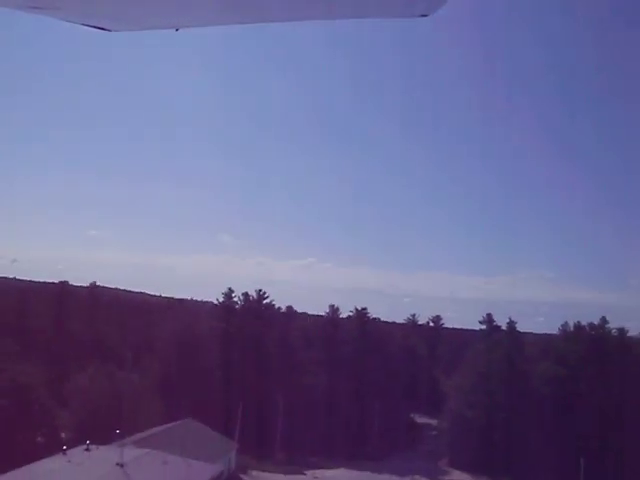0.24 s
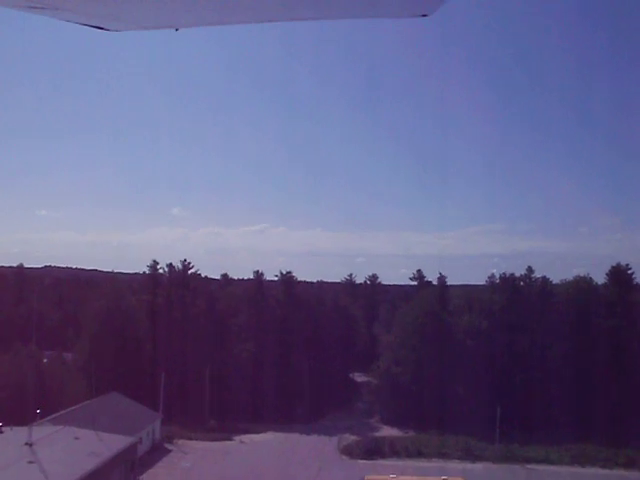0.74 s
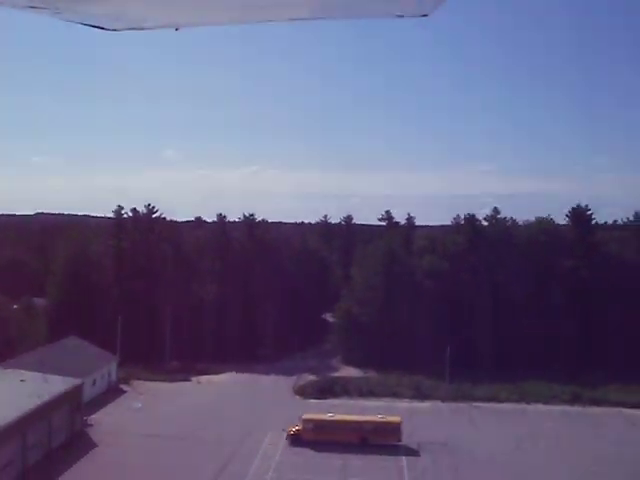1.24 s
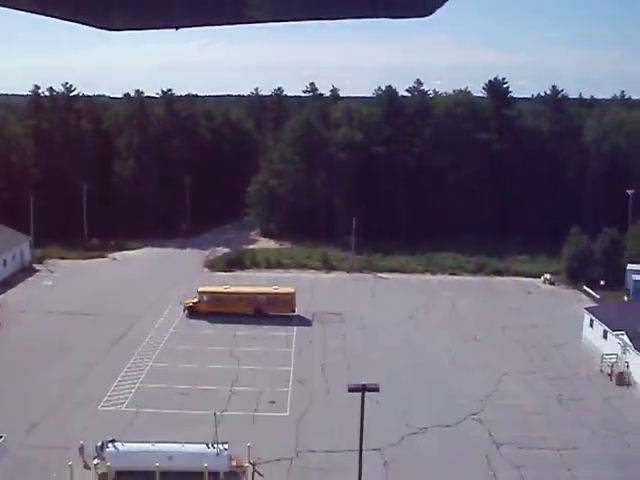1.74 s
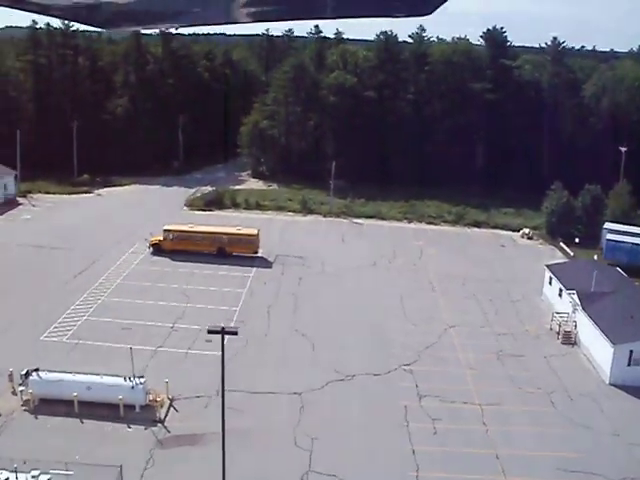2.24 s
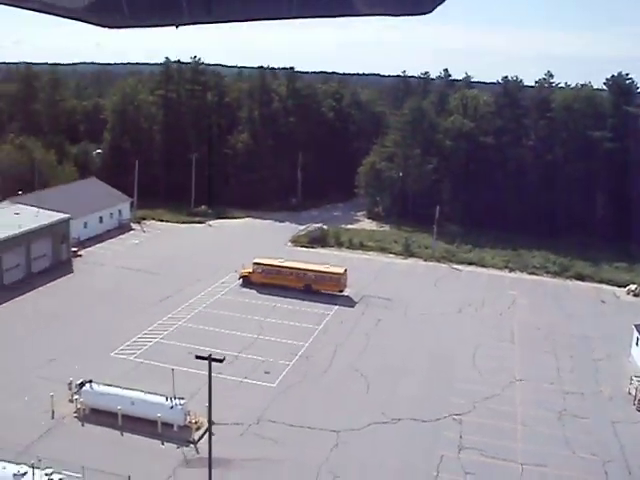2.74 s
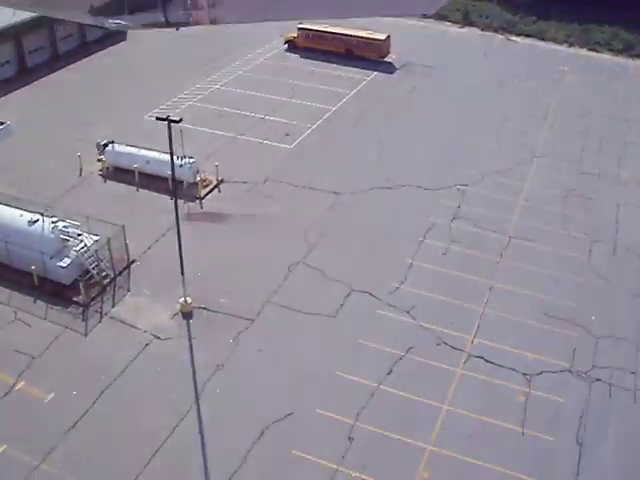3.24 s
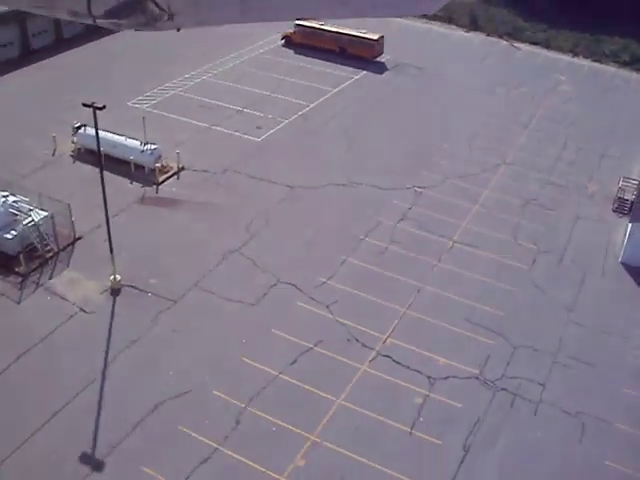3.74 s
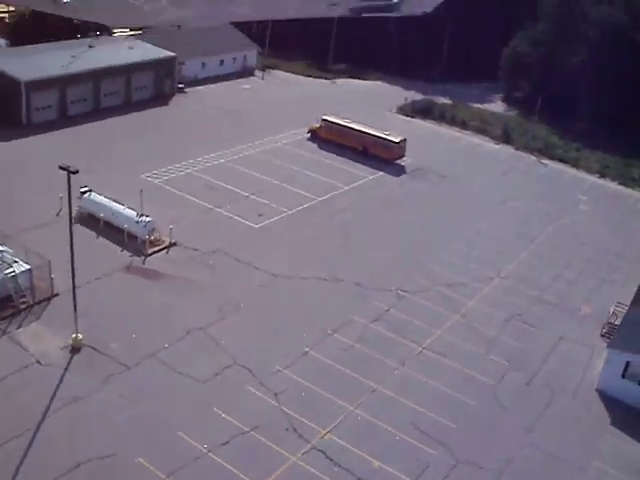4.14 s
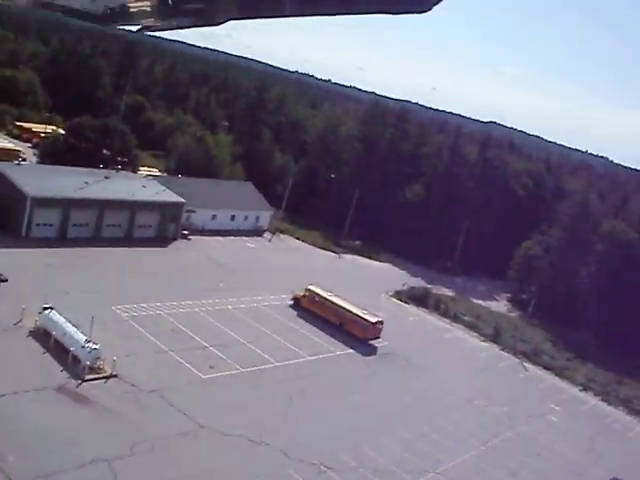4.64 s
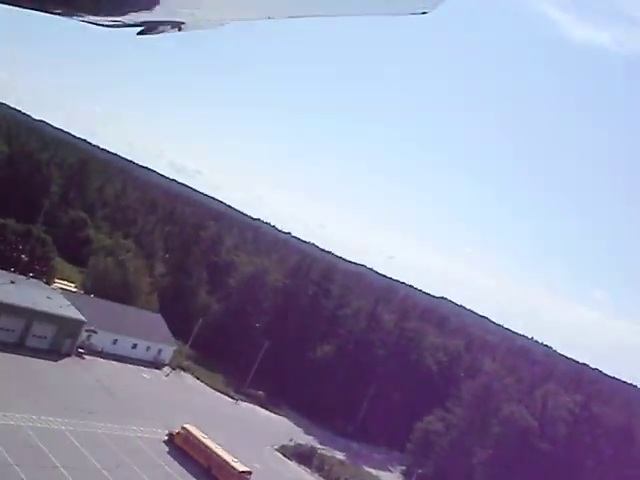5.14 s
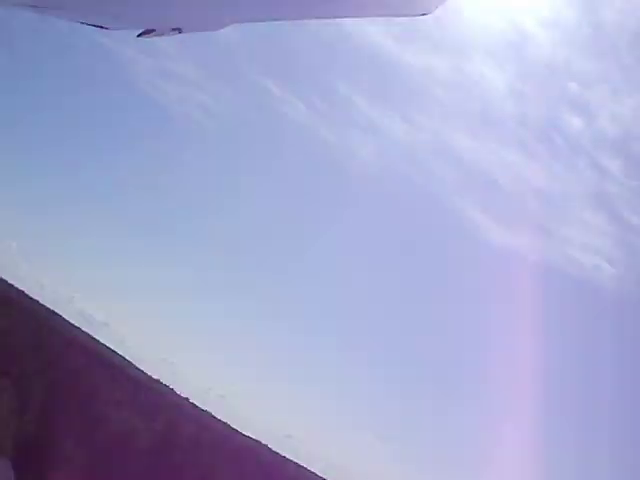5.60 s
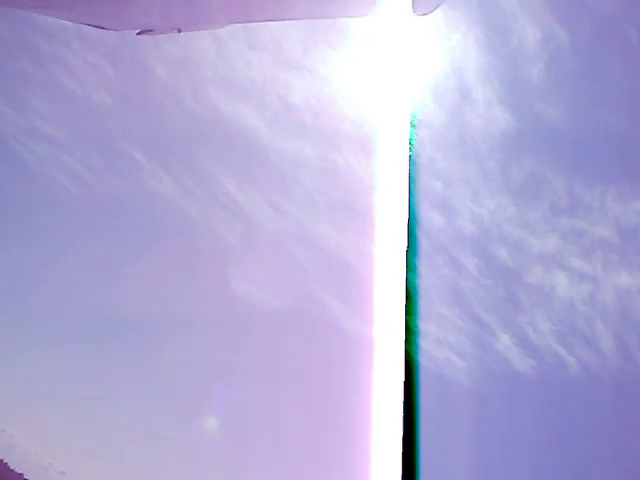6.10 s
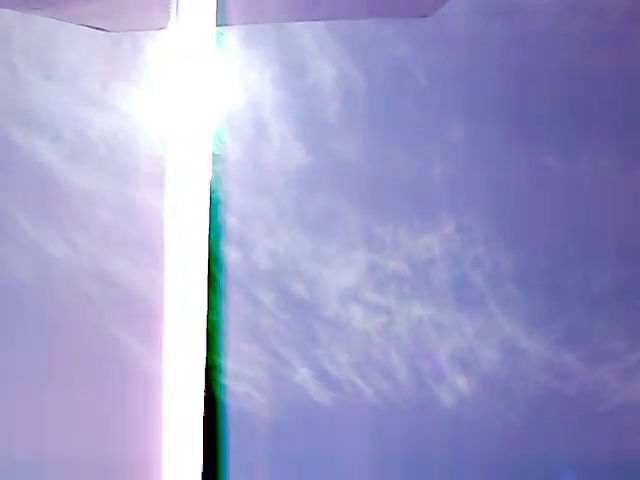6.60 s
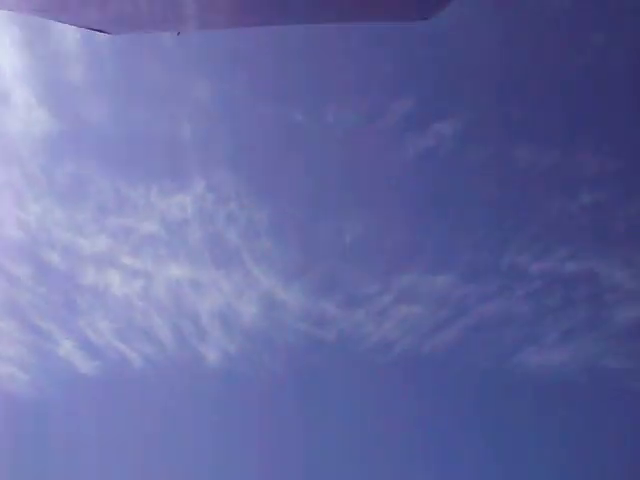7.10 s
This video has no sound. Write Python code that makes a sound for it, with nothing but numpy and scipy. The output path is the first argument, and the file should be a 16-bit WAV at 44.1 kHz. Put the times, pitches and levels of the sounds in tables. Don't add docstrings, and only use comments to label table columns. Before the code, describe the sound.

Continuous outdoor wind noise batters a tiny onboard microphone, close and dry, with no echo. Under it an electric motor and two-blade propeller hold a low, nasal buzz with a metallic whine. Gusts swell during the dives, slapping the microphone now and then; after the pull-up the motor note drops a little, the wind weakens and a pulsing hiss grows. Loud buffets crackle with overload.

```python
import sys
import numpy as np
from scipy import signal
from scipy.io import wavfile

SR = 44100
rng = np.random.default_rng(int(sys.argv[2]) if len(sys.argv) > 2 else 0)


def boost_factor(decibels):
    exponent = np.asarray(decibels, float) / 20
    return 10 ** exponent


def digitize_waveform(pressure):
    field = np.atleast_2d(pressure).T
    bounded = np.clip(field, -1, 1)
    quanta = np.round(bounded * 32767).astype(np.int16)
    wavfile.write(sys.argv[1], SR, quanta)


N = 324576


def rms_one(x):
    return x / np.sqrt(np.mean(x ** 2) + 1e-20)


def in_time(rows):
    times, values = np.transpose(rows)
    return np.interp(np.arange(N) / SR, times, values)


def drift(rate, size=N):
    r = np.exp(-80 * np.pi * rate / SR)
    coarse = rng.standard_normal(N // 40 + 2000)
    slow = signal.lfilter([1], [1, -2 * r, r * r], coarse)[2000:]
    return np.interp(np.linspace(0, len(slow), size), np.arange(len(slow)), rms_one(slow))


def turbulence(spectrum, together_db, own_db, rate):
    hz, db = np.transpose(spectrum)
    octaves = np.log2(hz[-1] / hz[0])
    edges = hz[0] * 2 ** np.arange(0, octaves + .5, .5)
    white = rng.standard_normal((2, N + 8000))
    out = 0
    for k, (low, high) in enumerate(zip(edges, edges[1:])):
        band_pass = signal.butter(2, [low, high], "band", fs=SR, output="sos")
        band = signal.sosfilt(band_pass, white[k % 2])[8000:]
        level_db = np.interp(np.log(low * high) / 2, np.log(hz), db)
        out = out + boost_factor(level_db + own_db * drift(rate)) * band
    return rms_one(boost_factor(together_db) * out)


def slipstream(turns, phase, gust_db):
    # (frequency [Hz], level [dB per Hz])
    buffet_spectrum = [(7.1, -54), (12, -18.5), (80, -1), (144, -1.5), (182, -0.5), (236, -4.5),
                       (392, -8.5), (600, -17), (780, -49.5), (1320, -120)]
    rush_spectrum = [(150, -41.5), (250, -1.5), (947, -8), (1010, -9), (1120, -12), (1200, -4),
                     (1560, -23.5), (2640, -120)]
    hiss_spectrum = [(470, -36), (800, -3.5), (1200, -14), (1600, -6), (2500, -6.5), (3200, -9.5),
                     (4200, -5), (5300, -24.5)]
    eddies = drift(29.0)
    lumps = drift(14.0)
    climb = np.clip(phase - 2, 0, 1)

    buffet_db = -13 + gust_db + .2 * lumps
    rush_db = -22 + .7 * gust_db + 0.3 * climb + .8 * lumps
    hiss_db = -27 + 0.34 * gust_db + 3.5 * climb + .8 * lumps

    buffet = boost_factor(buffet_db) * turbulence(buffet_spectrum, 1.2 * eddies, own_db=-0.24, rate=9.8)
    rush = boost_factor(rush_db) * turbulence(rush_spectrum, 3.07 * eddies, own_db=0.4, rate=10.0)
    hiss = boost_factor(hiss_db) * turbulence(hiss_spectrum, 0.19 * eddies, own_db=0.4, rate=130.0)
    wash = 1 + .18 * np.cos(2 * np.pi * turns) + .1 * np.cos(4 * np.pi * turns)
    return buffet + rush + wash * hiss


def motor(turns, phase, gust_db):
    turns, phase = turns[::4], phase[::4]
    blade_db = 0.53 * gust_db[::4]
    size = len(turns)
    out = 0
    for order, levels_db in order_levels():
        level_db = np.interp(phase, np.arange(4), levels_db)
        if order < 3:
            level_db = level_db + blade_db
        level_db = level_db + 1.1 * drift(2.5, size=size)
        late = -1.1 * np.cos(2 * np.pi * order / 13)
        lag = .7 * rng.standard_normal() + .3 * drift(1.2, size=size) - late
        out = out + boost_factor(level_db) * np.cos(2 * np.pi * order * turns + lag)
    return np.sqrt(2) * signal.resample(out, N)


def order_levels():
    # (order [multiple of turning rate], level flight [dB], dive [dB], pull-up [dB], climb [dB])
    strong_orders = [(1, -25.5, -29.5, -29.5, -21.5), (2, -26, -20, -21.5, -28),
                     (7, -39, -41.5, -48, -27.5), (9, -46.5, -38.5, -54, -39), (10, -40.5, -38.5, -50, -41),
                     (11, -30, -34.5, -32, -27.5), (12, -27.5, -39, -27.5, -37.5),
                     (13, -24, -27, -23, -27.5), (17, -47, -38, -48, -30), (19, -49, -36, -51, -40.5),
                     (22, -40, -41.5, -39.5, -58), (23, -40, -41.5, -39, -35.5), (24, -34, -43, -37, -45.5),
                     (25, -37.5, -47.5, -39, -43), (26, -39.5, -36.5, -29, -44),
                     (27, -36.5, -36.5, -31, -43.5), (28, -38.5, -39, -36, -35),
                     (31, -49, -42.5, -42.5, -38), (33, -44, -45.5, -48, -43.5),
                     (34, -38, -45.5, -38, -37.5), (35, -39.5, -54, -44.5, -44),
                     (37, -45, -43.5, -43.5, -41.5), (38, -46, -41.5, -38, -41),
                     (42, -39.5, -39.5, -42, -43)]
    top_order = 43
    orders = np.arange(1, top_order + 1)
    weak_db = -43 - .06 * orders
    scatter_db = 3.0 * rng.standard_normal((top_order, 4))
    levels_db = weak_db[:, None] + scatter_db
    for order, *db in strong_orders:
        levels_db[round(order) - 1] = db
    return zip(orders, levels_db)


def slaps():
    # (time [s], peak level [dB])
    slap_times = [(0.442, -3.5), (0.544, 0.5), (0.583, -14), (1.135, -5.5), (3.535, -11.5), (3.866, -8),
                  (3.935, -3.5), (4.02, -9.5), (4.173, -9.5), (4.488, -5.5), (4.755, -1.5), (5.067, -4.5),
                  (5.466, -5), (5.856, -7), (6.373, -8.5), (7.223, -11.5)]
    starts = np.zeros(N)
    for s, db in slap_times:
        starts[round(s * SR)] = boost_factor(db - 10.0)
    fade = np.exp(-1 / (0.0045 * SR))
    envelope = signal.lfilter([1], [1, -fade], starts + 1e-18)
    dull = signal.butter(1, [500., 1800.], "band", fs=SR, output="sos")
    return envelope * rms_one(signal.sosfilt(dull, rng.standard_normal(N)))


def scene():
    # (time [s], speed [turns per s])
    shaft_speed = [(0, 92.1), (.43, 92.4), (1.09, 92.3), (1.45, 93.0), (1.93, 93.2), (2.05, 92.7),
                   (2.36, 92.4), (2.8, 93.3), (3.57, 92.7), (4.86, 92.7), (5.06, 92.3), (5.25, 90.4),
                   (5.66, 89.85), (5.9, 89.85), (6.05, 91.05), (6.87, 91.0), (7.36, 91.3)]
    # (time [s], phase [0 level, 1 dive, 2 pull-up, 3 climb])
    flight_phase = [(0, .15), (1.4, .05), (1.8, 1.), (2.6, 1.), (2.9, .4), (3.35, .4), (3.7, 1.),
                    (4.75, 1.1), (5.2, 2.), (6.0, 2.), (6.25, 2.3), (6.45, 2.8), (6.9, 3.), (7.36, 3.)]
    # (time [s], level [dB])
    gusts = [(0, -13), (.5, -14), (.8, -13.5), (1.05, -17.5), (1.5, -13), (1.75, -15), (2.1, -11.5),
             (2.5, -11), (2.7, -13.5), (3.15, -15.5), (3.5, -12), (3.75, -12), (4.05, -9.5), (5.0, -10.5),
             (5.3, -13.5), (5.85, -12), (6.4, -16), (7.36, -14.5)]
    turns = np.cumsum(in_time(shaft_speed)) / SR
    phase = in_time(flight_phase)
    gust_db = in_time(gusts)
    gust_db = gust_db - gust_db.mean()
    mix = slipstream(turns, phase, gust_db) + motor(turns, phase, gust_db) + slaps()
    return mix[None]


def roll_off(x):
    return signal.sosfilt(signal.butter(12, 15850, fs=SR, output="sos"), x)


def record(dry):
    overload, knee, ceiling = .712, 12, .707
    coarse = signal.resample(dry, N * 8000 // SR, axis=1)
    coarse = coarse + .07 * coarse ** 2 - .014
    coarse = coarse / (1 + (coarse / overload) ** knee) ** (1 / knee)
    kernel = signal.firwin(26 * 441 + 1, .977 / 441, window=("kaiser", 9.))
    fine = signal.resample_poly(coarse, 441, 80, axis=1, window=kernel)[:, :N]
    fine = np.clip(fine, -ceiling, ceiling)
    return roll_off(fine)


dry = scene()
out = record(dry)
digitize_waveform(out)
```